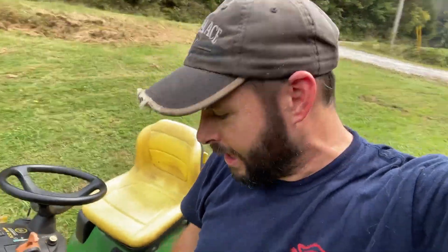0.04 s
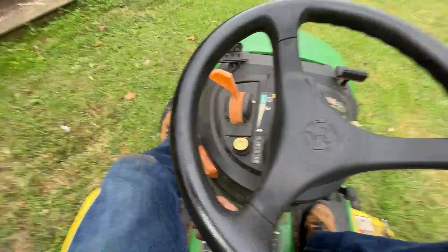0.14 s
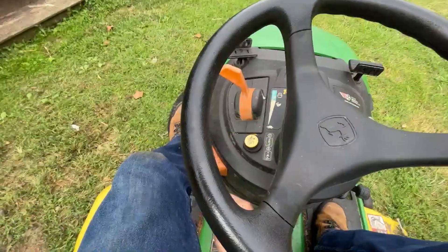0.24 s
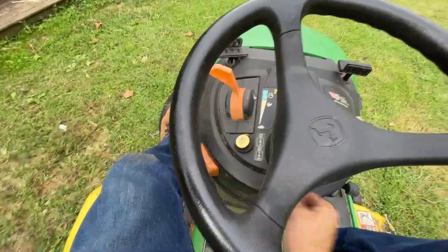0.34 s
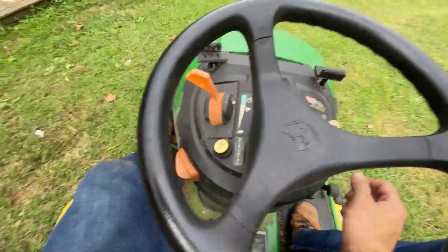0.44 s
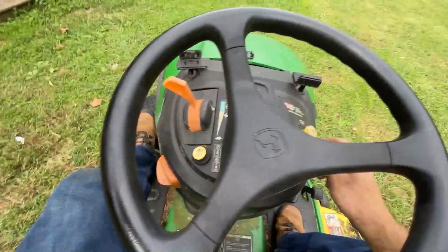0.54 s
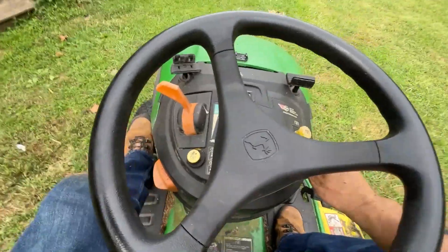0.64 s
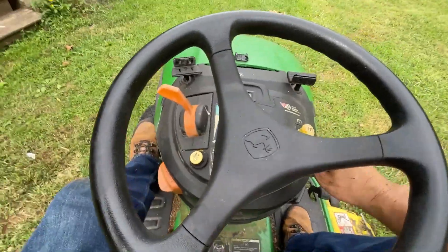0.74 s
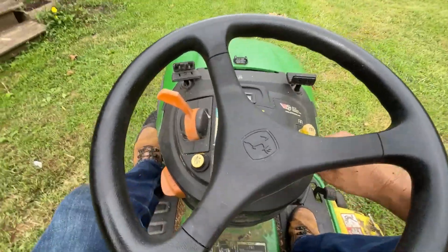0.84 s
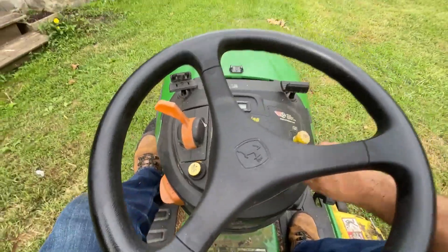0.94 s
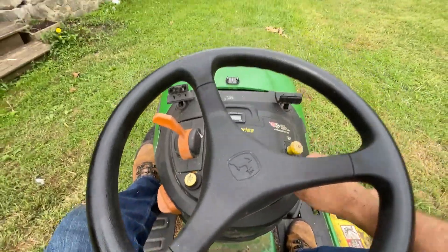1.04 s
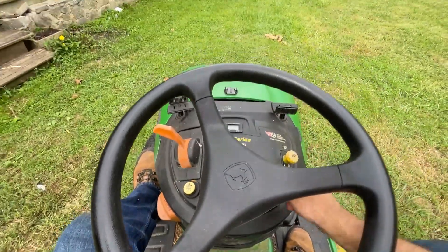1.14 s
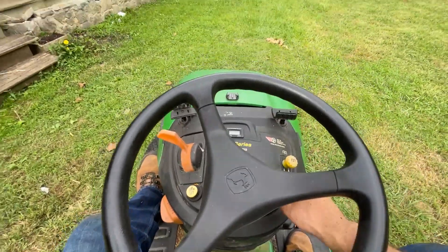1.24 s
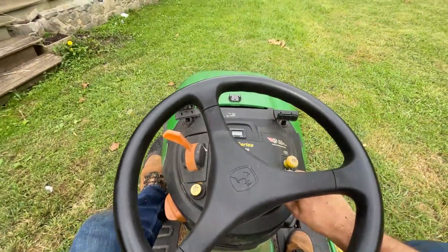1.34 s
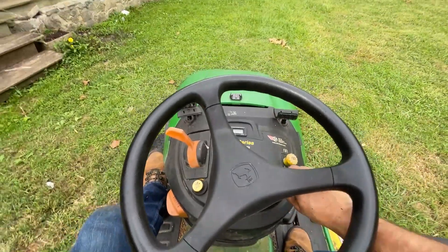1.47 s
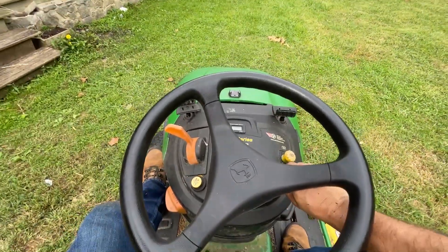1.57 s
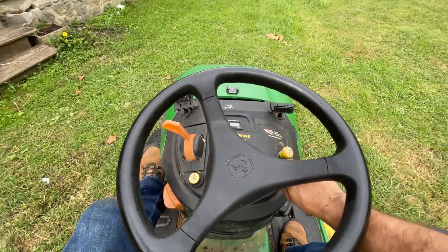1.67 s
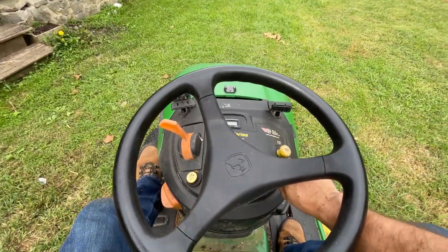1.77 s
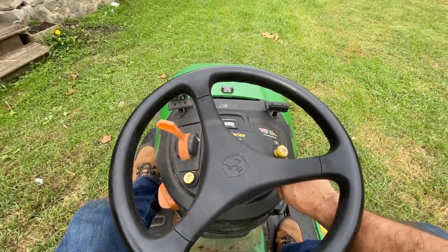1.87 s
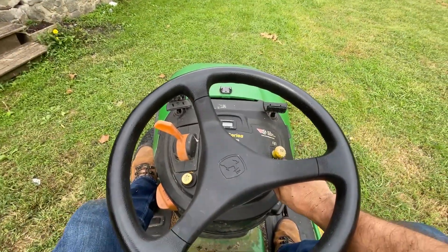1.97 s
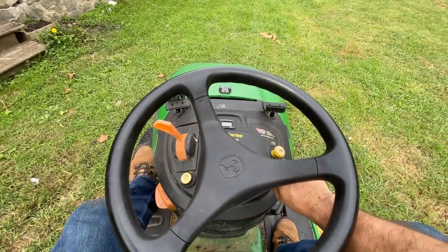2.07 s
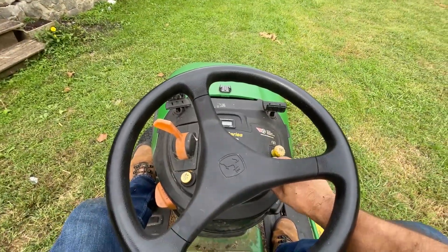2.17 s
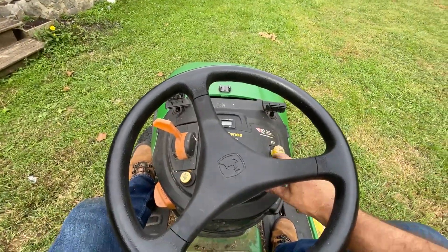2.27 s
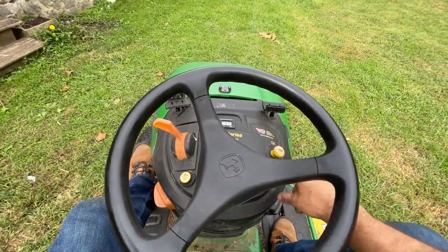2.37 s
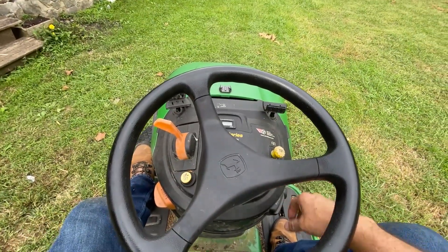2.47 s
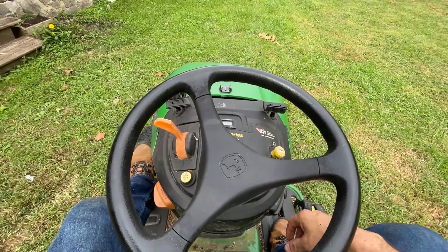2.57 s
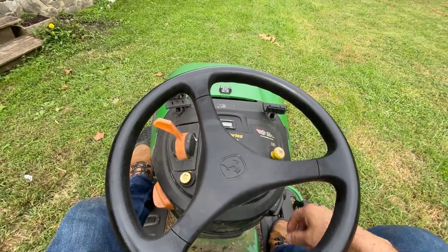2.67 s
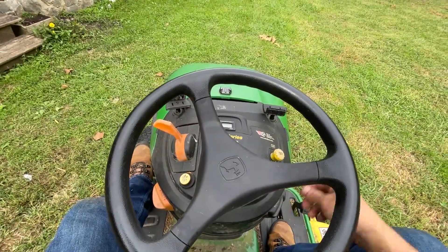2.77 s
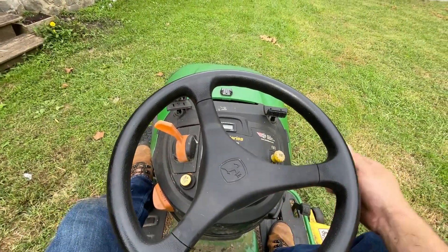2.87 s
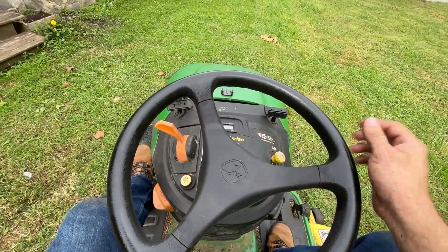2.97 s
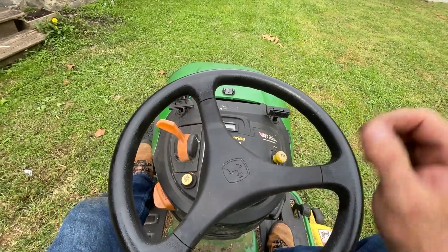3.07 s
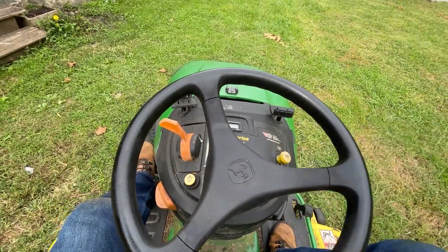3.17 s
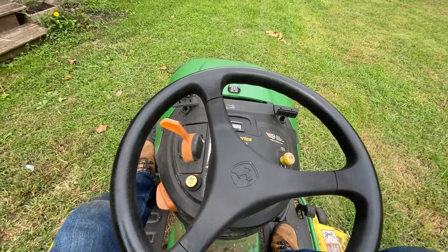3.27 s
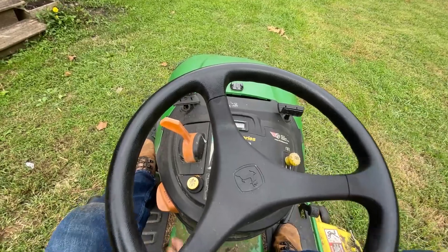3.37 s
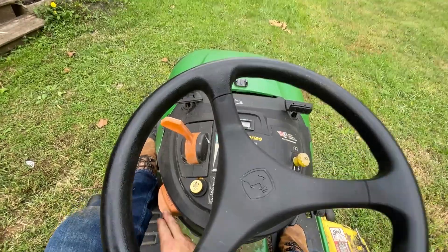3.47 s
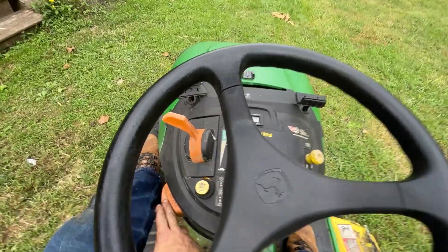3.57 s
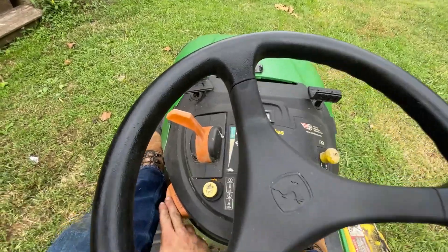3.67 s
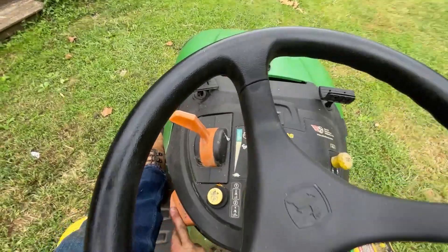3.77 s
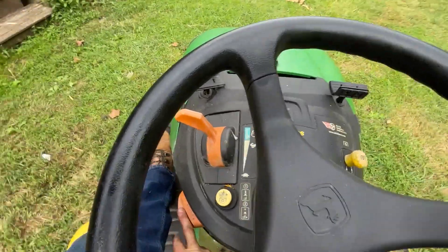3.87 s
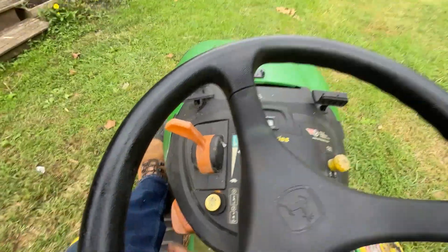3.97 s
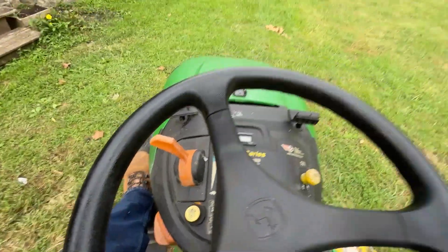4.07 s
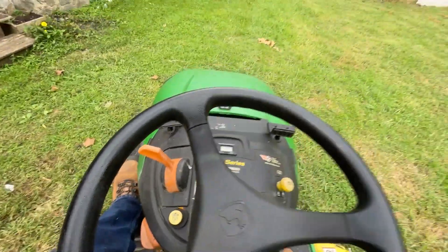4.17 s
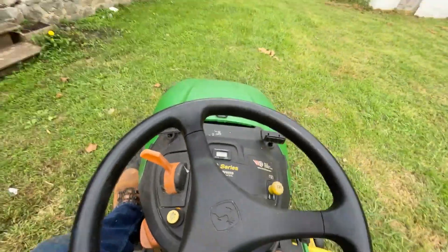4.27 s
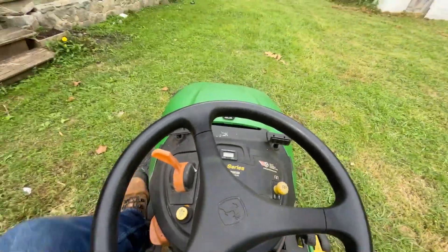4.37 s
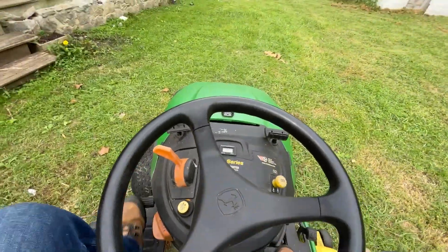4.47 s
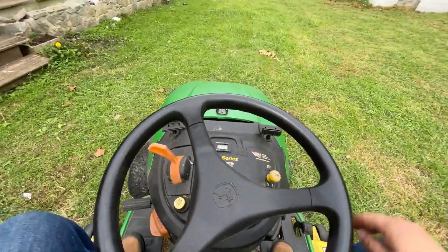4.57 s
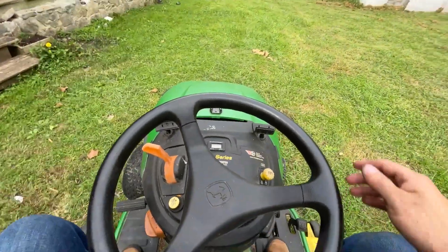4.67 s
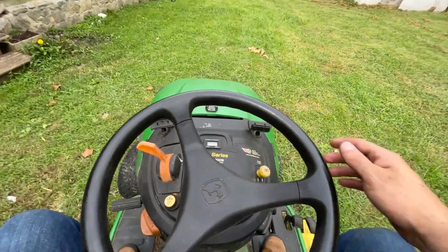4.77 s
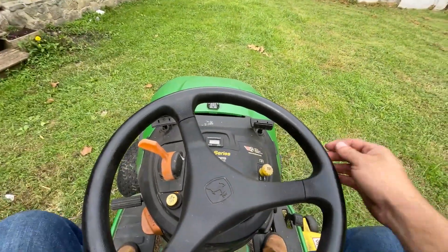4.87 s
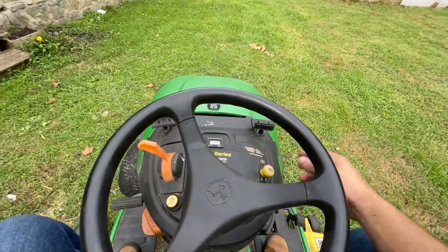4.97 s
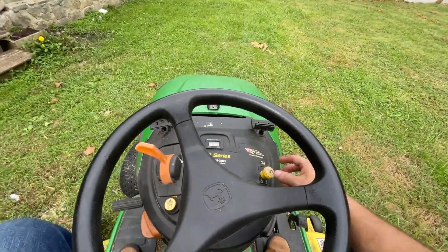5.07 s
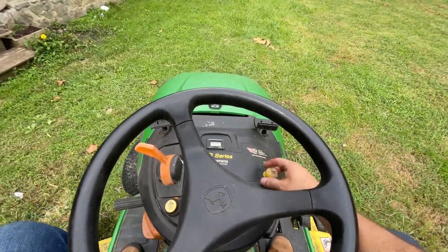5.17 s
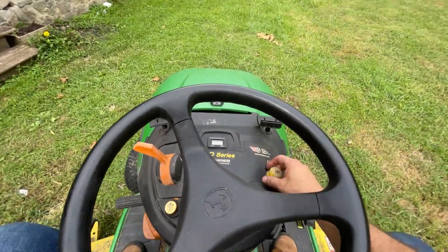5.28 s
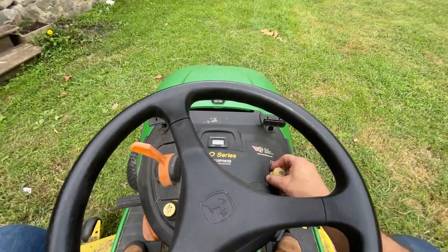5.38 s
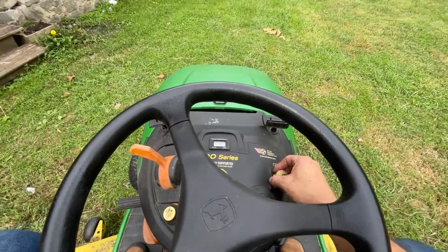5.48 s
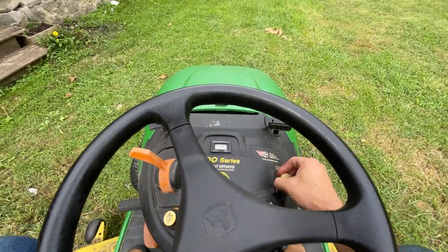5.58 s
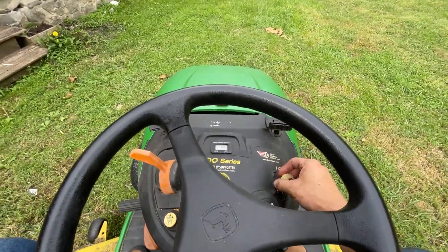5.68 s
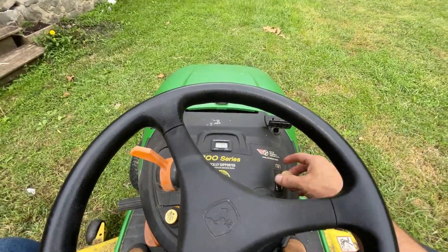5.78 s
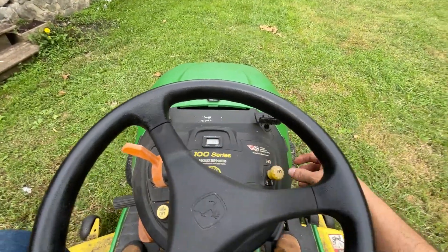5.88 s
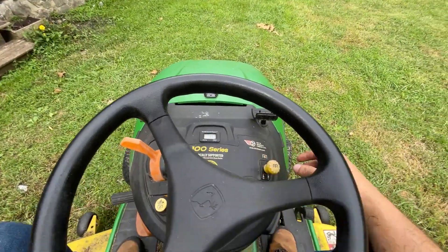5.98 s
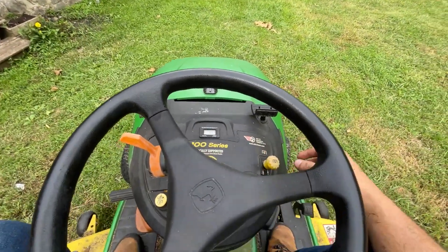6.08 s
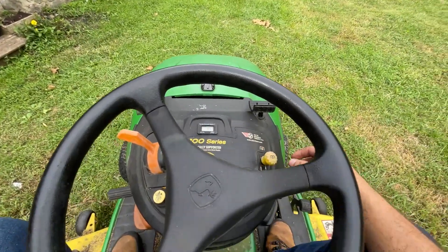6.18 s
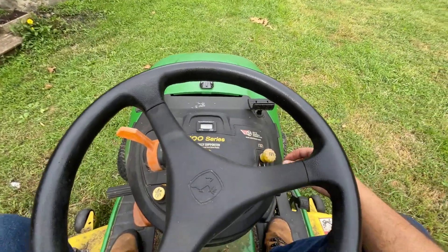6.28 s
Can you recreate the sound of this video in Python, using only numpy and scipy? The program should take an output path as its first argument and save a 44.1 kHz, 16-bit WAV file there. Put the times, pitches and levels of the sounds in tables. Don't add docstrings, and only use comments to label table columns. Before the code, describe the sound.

Outdoors on a lawn, heard from the mower seat: soft air, an insect buzz and slow ticks, with hollow knocks on pedal and panels. A starter grinds with metal bangs, uneven firings catch, and a two-cylinder engine hums loudly with clattering valves and loose plates. It misses briefly, backfires once, runs on, then sags into lumpy firing and begins picking up again. Close handheld stereo, slightly limited.

```python
import sys
import numpy as np
from scipy import signal
from scipy.fft import rfft, irfft, next_fast_len
from scipy.io import wavfile

SR = 44100
rng = np.random.default_rng(int(sys.argv[2]) if len(sys.argv) > 2 else 0)


def natural_amplitude(level_db):
    exponent = np.asarray(level_db, float) / 20
    return 10 ** exponent


def unload_audio(sound):
    columns = np.transpose(np.atleast_2d(sound))
    steps = np.round(np.clip(columns, -1, 1) * 32767)
    wavfile.write(sys.argv[1], SR, steps.astype(np.int16))


N = 278712
SIZE = next_fast_len(N, True)
TIME = np.arange(N) / SR
FREQ = np.maximum(np.fft.rfftfreq(SIZE, 1 / SR), 1)

# (frequency [Hz], likeness [0-1])
MACHINE_LIKENESS = [(60, 0.84), (290, 0.77), (560, 0.15), (860, .35), (1410, 0.2), (2900, 0.1), (3900, 0.3),
                    (4900, .1), (6100, 0.44), (8100, 0.1), (10000, 0.35), (15000, .011)]
LAWN_LIKENESS = [(60, .05), (200, 0.63), (700, 0.089), (2380, 0.12), (15000, .01)]
# (frequency [Hz], left over right [dB])
ENGINE_TILT = [(60, 3.5), (180, 3.5), (550, 3.5), (1650, 3.5), (4970, 0.5), (15000, 1.5)]
# (frequency [Hz], lead [radians])
PORT_LEAD = [(520, 0), (860, .7), (1500, 0), (2200, -1.5), (4300, -1.6), (5300, -2.7), (6400, -.3),
             (7100, -3.1), (10200, -4.8), (11000, -6.3)]
# (frequency [Hz], side gain [dB])
SIDE_TOP = [(10400, 0.5), (10700, -30), (12100, -30), (12400, 0), (13800, 7), (15000, 10)]

# (frequency [Hz], density [dB per Hz])
AIR_COLOUR = [(15, -38), (25, -10), (70, 5.5), (206, -5), (277, -4), (317, -4), (908, -14), (1400, -20),
              (1780, -11), (2250, -23), (3000, -20), (3550, -18.5), (4100, -28), (4700, -22), (5600, -30),
              (7000, -15.5), (8780, -14.5), (13500, -21.5), (15400, -14), (15900, -24)]
AIR_DB, LULL_S, LULL_DB = -42, 0.46, -3.5
# (time [s], level [dB], wing strokes [per s])
BUZZ = [
    (0.0, -41, 110),
    (0.35, -42, 114),
    (0.52, -41, 95),
    (0.796, -40, 110),
    (0.836, -58, 98),
]
# (time [s], peak [dB])
TICKS = [
    (0.8943, -37.5),
    (0.9581, -39),
    (1.0316, -36.5),
    (1.1093, -36.5),
    (1.1886, -39),
    (1.2664, -35),
    (1.341, -37.5),
    (1.4161, -37.5),
    (1.4969, -37),
    (1.569, -34),
]
# (frequency [Hz], density [dB per Hz])
INSECT_COLOUR = [(3530, -51), (6000, -22), (6530, -8), (7900, -7.5), (8900, 5), (9700, -6.5), (10800, 3),
                 (11900, -4.5), (13300, -5), (13900, -6), (14200, -20), (14600, -36), (14700, -16),
                 (15000, -6), (15800, -25)]
# (time [s], peak [dB], body [Hz],
# crack over peak [dB], left over right [dB])
KNOCKS = [(0.201, -35, 300, 8, 1.5), (0.234, -42, 290, -10, 3), (0.661, -14, 298, -8, 5),
          (0.881, -21, 312, -8, 3.5), (1.102, -24.5, 290, 14.5, 1), (1.121, -15.5, 321, -11, 3.5),
          (1.265, -34, 300, 4, 2), (1.457, -41, 250, 11, 2), (1.673, -19.5, 417, -5, 2),
          (1.568, -13, 298, -2, 3), (1.697, -10.5, 300, -16, 5)]
# (frequency [Hz], width [Hz], level [dB])
PANEL_MODES = [(455, 43, -5), (530, 64, -6), (746, 170, -13), (184, 22, -2), (130, 30, -10.5),
               (1000, 120, -22), (1410, 170, -21), (2080, 220, -32), (2740, 370, -34), (3560, 250, -43)]
# (time [s], peak [dB], body [Hz], spread [s])
SHOVES = [(0.801, -41, 300, 0.011), (0.873, -42, 280, .014), (0.926, -37, 245, 0.0075),
          (0.965, -28, 286, .013), (1.0, -41, 480, .02), (1.04, -46, 280, 0.011), (1.2, -38, 260, 0.0087),
          (1.43, -40, 300, 0.01), (0.711, -23, 308, 0.0069), (0.735, -32.5, 290, 0.013),
          (0.75, -40, 169, 0.016), (0.9, -39.5, 141, 0.027), (0.915, -35, 187, .014),
          (1.01, -41, 151, 0.021), (1.155, -33, 230, 0.013), (1.445, -42, 200, .015),
          (1.466, -37, 290, 0.0068)]
# (frequency [Hz], level [dB])
LATCH_MODES = [(1120, 2.5), (1324, 2.5), (1879, 1), (3090, -5), (3400, -3), (4760, -13)]
# (time [s], peak [dB], t60 [s])
LATCH_HITS = [
    (1.103, -27, 0.046),
    (1.108, -29, .06),
    (1.119, -30.5, 0.045),
    (1.270, -47, .04),
    (1.570, -30.5, .035),
]

# (time [s], peak [dB], t60 [s], top [Hz])
BANGS = [(1.671, -20, 0.075, 6000), (1.685, -14, 0.052, 7900), (1.704, -23, .03, 8200),
         (2.2, -17.5, 0.24, 3600), (2.052, -19, .12, 3400), (2.092, -19, .08, 3600), (1.69, -8, 0.08, 3100),
         (1.701, -6.5, 0.049, 2100), (1.708, -10, 0.081, 2300), (1.6, -31, 0.079, 5200),
         (1.862, -12, 0.11, 1400), (1.878, -26, 0.22, 7000), (1.9916, -7, 0.088, 2000),
         (2.0, -9, 0.11, 1840), (1.992, -25, 0.16, 9800), (2.039, -29.5, .15, 11000),
         (2.158, -29, 0.09, 12000), (2.246, -19, 0.086, 3800), (2.241, -30, 0.084, 12500),
         (2.42, -28.5, 0.075, 11500), (2.452, -32, 0.17, 13000), (3, -23, .05, 2000),
         (3.223, -4.5, 0.058, 1200), (5.721, -34, 0.08, 9000), (6.16, -28.5, 0.053, 9200),
         (6.2, -34, 0.09, 11000), (5.7, -31, 0.065, 6000), (4.535, -17, .2, 3000), (4.565, -19, .15, 3000),
         (4.655, -18, .12, 2200), (2.27, -21, .1, 3500), (4.503, -29.5, 0.24, 9000),
         (3.528, -29, 0.032, 1500), (3.716, -19, .04, 1400), (6.3, -9, .04, 1000),
         (5.741, -17, 0.034, 1200), (5.956, -33.5, 0.18, 8100), (6.043, -31.5, 0.34, 7300),
         (6.233, -28, 0.045, 8300)]
# (time [s], peak [dB], t60 [s], top [Hz])
BACKFIRE = [
    (3.7805, 0, .06, 2300),
    (3.7815, -22, .03, 16000),
]
BACKFIRE_S, DIP_DB, DIP_S = 3.8, -7, .012

# (time [s], rate [cycles per s])
SPEED = [(2.25, 18.4), (2.43, 23.8), (2.56, 26.2), (2.75, 27.2), (2.9, 27.0), (3.21, 24.9), (3.4, 26.9),
         (3.75, 26.7), (4.05, 26.2), (4.45, 25.85), (4.69, 25.43), (5.12, 26.2), (5.35, 25.7), (5.63, 25.7),
         (5.8, 20.5), (5.97, 18.5), (6.1, 19.3), (6.32, 23.0)]
# (time [s], level [dB])
EFFORT = [(1.672, -17), (1.78, -9), (1.87, -3), (2.04, 4), (2.43, 2), (2.9, -0.1), (3.5, 0.8), (3.95, -0.5),
          (4.5, .5), (4.75, -1.2), (5.62, 0.1), (5.9, -1.5), (6.32, 2)]
GOVERNED_PER_S, SAG_SPAN_PER_S, BOG_S = 25.1, 4.6, 5.0
# (governed level [dB], share of effort [ratio], change when bogged [dB])
RUNNING = [
    (-24, 1.05, 6),
    (-25.5, 0.81, -5),
    (-33.5, 0.5, -8),
]
# (place [share of cycle], level [dB])
VALVES = [
    (.04, 0),
    (.25, -1),
    (.41, -2),
    (.69, -1),
    (.95, -1),
]
# (frequency [Hz], density [dB per Hz])
ENGINE_COLOUR = [(24, -43), (40, -12), (80, -6), (119, -4), (211, -9), (306, -15.5), (422, -18), (933, -23),
                 (3390, -35), (6140, -40.5), (6800, -42.5), (7310, -47), (7900, -44), (8910, -43.5),
                 (11700, -50), (13600, -54.5), (15000, -122)]
# (frequency [Hz], width [Hz], height [dB])
CASING_MODES = [(370, 60, 3), (500, 50, 2), (760, 80, 2.5), (1320, 60, 3), (1480, 90, 2.5), (2750, 90, 3),
                (3085, 60, 3), (6170, 400, 3), (8600, 700, 3)]
# (frequency [Hz], width [Hz], level [dB])
STARTER_RIDGES = [(345, 130, 1), (493, 70, 3), (769, 90, 3.5), (970, 160, -11), (1190, 98, -5),
                  (1560, 140, -11), (1820, 140, -10), (2760, 140, -11), (3700, 820, -23), (5100, 350, -22),
                  (6600, 1000, -29)]
# (time [s], peak [dB], pipe
# ring [Hz])
POPS = [(1.76, -31, 70), (1.83, -26, 60), (1.938, -2.5, 119), (2.012, -11, 90), (2.048, -4.5, 138),
        (2.075, -2.5, 213), (2.088, -8, 96), (2.103, -2, 86), (2.131, -7, 186), (2.146, -11, 317),
        (2.166, -2.5, 190), (2.180, -1.5, 272), (2.2, -2, 98), (2.214, -6, 145), (2.235, -7.5, 320),
        (2.256, -0.5, 274), (2.269, -3, 202), (2.289, -1.5, 190), (2.311, -5, 172), (2.323, -15, 150),
        (2.347, -4, 202), (2.365, -3, 186), (2.378, -6, 176), (2.397, 0, 186), (2.413, 2, 184),
        (2.426, -9, 172), (2.441, -1, 179), (2.461, -6, 139), (2.476, -7.5, 220), (2.495, -8.5, 290),
        (2.51, -0.5, 199), (2.545, -9.5, 270), (3.787, -7, 300), (4.47, -10, 255), (4.55, -12, 308),
        (4.67, -7, 260), (4.9, -12, 300)]
# (time [s], peak [dB], pipe ring [Hz])
BOG_POPS = [(5.713, -3, 201), (5.733, -3, 182), (5.751, -6, 145), (5.771, -8.5, 403), (5.789, -9, 385),
            (5.805, -15, 172), (5.819, -14, 296), (5.843, -9, 250), (5.856, -10, 210), (5.868, -9, 370),
            (5.882, -7, 176), (5.907, -8, 182), (5.955, -13, 503), (5.974, -8, 312), (5.996, -14, 172),
            (6.009, -13, 75), (6.036, -8.5, 454), (6.051, -15, 177), (6.066, -11, 376), (6.08, -7, 86),
            (6.097, -9, 238), (6.13, -13, 150), (6.142, -9, 208), (6.159, -7, 183), (6.172, -7, 525),
            (6.196, -12, 178), (6.212, -4, 200), (6.233, -6.5, 129), (6.266, -10.5, 183), (6.282, -9, 236),
            (6.302, -6, 134), (5.741, -17, 700), (6.068, -13, 790), (5.915, -14, 560), (6.3, -7.5, 550),
            (5.9, -11, 520)]
WEAK_DB, WEAK_SPREAD_DB, WEAK_HZ, WEAK_OCTAVES = -11, 2.0, 400, .35
# (time [s], peak [dB], pitch [Hz], length [s])
SQUEAKS = [(1.81, -39, 5150, .05), (1.86, -34, 2760, .07), (1.95, -34, 2800, .04), (1.99, -30, 2650, .03),
           (1.935, -27, 1550, .05), (2.13, -25, 1500, .04), (2.48, -30, 3100, .05), (2.97, -23, 1500, .04),
           (4.445, -36, 6200, .02), (4.505, -35, 5200, .02), (5.38, -37, 4500, .03), (6.25, -36, 3050, .04)]
# (pitch [Hz], level [dB])
LOOSE_PLATES = [(700, -4), (770, -5), (845, -4), (930, -1), (1030, -2), (1160, -11), (1320, -4), (1470, -3),
                (1590, -3), (1900, -6), (2350, -8), (2750, -11), (3085, -12)]
RATTLE_DB, RATTLES_PER_S, RATTLE_T60_S, RATTLE_FITS_DB = -29, 140, .07, 3.0
PLATE_WANDER = .018
# (time [s], peak [dB], spread [s])
PUFFS = [(2.015, -44, .012), (2.035, -45, .008), (2.058, -46, .008), (2.097, -44, .007), (2.12, -47, .008),
         (2.165, -41, .009), (2.25, -44, .009), (2.275, -47, .007), (2.36, -45, .006), (2.43, -47, .01),
         (2.465, -45, .012), (5.635, -45, .012), (5.885, -51, .01), (5.97, -44, .011), (6.056, -43, .011),
         (6.29, -47, .015)]
# (frequency [Hz], width [Hz], level [dB])
PUFF_RIDGES = [(6200, 700, -8), (8700, 1000, 5), (10800, 1200, -6), (12500, 1200, -10)]

CYLINDER_GAP = 3 / 8
# (order [per cycle], level over the 2nd [dB])
PAIRED_ORDERS = [(1, -22), (2, 1.5), (4, -10), (6, 3), (7, -2), (9, -3.5), (10, -2), (11, -8), (13, -14),
                 (14, -5.5), (16, -1.5), (17, -12), (18, -14), (19, -13), (21, -14), (22, -13), (24, -11.5),
                 (25, -24), (26, -13), (28, -15), (29, -16), (30, -16), (32, -15), (35, -14), (40, -15)]
# (order [per cycle], level over the 3rd [dB])
LONE_ORDERS = [(3, 0), (4, -6), (6, -7), (7, -9), (9, -11), (10, -12), (12, -11), (13, -13)]
# (governed level [dB], change when sagging [dB])
EXHAUST_LAYERS = [
    (-18, -7),
    (-18.5, 2),
    (-38, 15),
    (-29.5, -6.5),
]
MISS_CHANGE = (-3, -12, 21, -20)
# (time [s], length [s], depth [0-1])
MISSES = [
    (2.955, 0.254, 0.89),
    (4.425, 0.027, 0.94),
    (2.47, 0.065, 0.4),
]
MISS_EDGE_S = 0.01
BOG_TONE_DB = -9
SURGE_DB, SURGE_HZ = -27, (300, 643)


def rms_one(x):
    return x / np.sqrt(np.mean(x ** 2) + 1e-20)


def in_time(rows):
    s, *columns = np.transpose(rows)
    return [np.interp(TIME, s, c) for c in columns]


def over_hz(points):
    hz, value = np.transpose(points)
    return np.interp(np.log(FREQ), np.log(np.maximum(hz, 1)), value)


def ridges(modes):
    return sum(natural_amplitude(db) / (1 + (2 * (FREQ - hz) / width) ** 2) for hz, width, db in modes)


def drift(rate):
    steps = rng.standard_normal(int(N / SR * 400) + 2)
    r = np.exp(-2 * np.pi * rate / 400)
    smooth = rms_one(signal.lfilter([1], [1, -2 * r, r * r], steps))
    return np.interp(TIME * 400, np.arange(len(steps)), smooth)


def shaped(x, gain):
    return irfft(rfft(x, SIZE) * gain, SIZE)[..., :N]


def wide(gate, gain, likeness=MACHINE_LIKENESS):
    alike = np.clip(over_hz(likeness), 0, 1)
    noise = gate * rng.standard_normal((2, N))
    mid, side = shaped(noise, gain * np.sqrt([1 + alike, 1 - alike]))
    return np.array([mid + side, mid - side]) / np.sqrt(2 * np.mean(gain ** 2))


def band_pass(x, low_hz, high_hz, order=2):
    return signal.sosfilt(signal.butter(order, [low_hz, high_hz], "band", fs=SR, output="sos"), x)


def ring(length, hz, t60, rise):
    t = np.arange(int(length * SR)) / SR
    return np.sin(2 * np.pi * hz * t) * natural_amplitude(-60 * t / t60) * (1 - np.exp(-t / rise))


def add(out, s, sound):
    i = int(s * SR)
    out[..., i:i + sound.shape[-1]] += sound[..., :N - i]


def lawn_air():
    level_db = AIR_DB + LULL_DB * np.clip((TIME - LULL_S) * 10, 0, 1)
    return natural_amplitude(level_db) * wide(natural_amplitude(1.5 * drift(6.4)), natural_amplitude(over_hz(AIR_COLOUR)), LAWN_LIKENESS)


def insects():
    buzz_db, strokes = in_time(BUZZ)
    stroke = np.exp(0.48 * np.cos(2 * np.pi * np.cumsum(strokes) / SR) + 0.12 * drift(60))
    gate = natural_amplitude(buzz_db) * rms_one(stroke)
    t = np.arange(int(.012 * SR)) / SR
    tick = np.sin(np.pi * t / t[-1]) ** 2 * np.exp(-t / 0.0031) * 4.6
    for s, db in TICKS:
        for lag, drop_db in ((0, -1), (.019, -10), (.034, -12)):
            add(gate, s + lag, natural_amplitude(db + drop_db) * tick)
    return wide(gate, natural_amplitude(over_hz(INSECT_COLOUR)), LAWN_LIKENESS)


def knocks():
    out = np.zeros((2, N))
    t = np.arange(int(.3 * SR)) / SR
    rumble_cut = signal.butter(2, 110, "high", fs=SR, output="sos")
    for s, db, hz, crack_db, pan_db in KNOCKS:
        body = ring(.3, hz, 0.11, 0.0012) + 0.29 * ring(.3, hz * 0.8, 0.28, 0.0013)
        shake, left, right = rng.standard_normal((3, len(t))) * (1 - np.exp(-t / 0.00029))
        for mode_hz, width, mode_db in PANEL_MODES:
            panel = rms_one(band_pass(shake, mode_hz - width / 2, mode_hz + width / 2))
            body = body + natural_amplitude(mode_db - 60 * t / 0.099) * panel
        crack = band_pass([left, right], 700, 3900)
        for tick_hz in rng.uniform(0.96, 3.3, 5) * 1000:
            crack = crack + 0.21 * ring(.3, tick_hz, 0.089, 0.00033)
        body = signal.sosfilt(rumble_cut, body)
        crack = natural_amplitude(crack_db - 11.5 - 60 * t / 0.066) * crack
        add(out, s, natural_amplitude(db) * natural_amplitude([[pan_db / 2], [-pan_db / 2]]) * (body + crack))
    return out


def shoves():
    out = np.zeros(N)
    t = np.arange(-.05, .05, 1 / SR)
    for s, db, hz, spread in SHOVES:
        scuff = rms_one(band_pass(rng.standard_normal(len(t)), 130, 1150))
        swell = np.exp(-.5 * (t / spread) ** 2)
        add(out, s - .05, natural_amplitude(db) * swell * (np.sin(2 * np.pi * hz * t) + 0.16 * scuff))
    return out * natural_amplitude([[2.2], [-2.2]])


def latch():
    out = np.zeros((2, N))
    for s, db, t60 in LATCH_HITS:
        ears_db = rng.normal(0, 2.7, (len(LATCH_MODES), 2))
        for (hz, mode_db), (left, right) in zip(LATCH_MODES, ears_db):
            ears = natural_amplitude([[left], [right]]) * np.sign([[1], [right]])
            add(out, s, natural_amplitude(db + mode_db) * ears * ring(.1, hz, t60, 0.00043))
    return out


def bangs():
    out = np.zeros((2, N))
    t = np.arange(int(.15 * SR)) / SR
    for s, db, t60, top_hz in BANGS + BACKFIRE:
        mid, side = rng.standard_normal((2, len(t))) * natural_amplitude(-60 * t / t60) * (1 - np.exp(-t / .0006))
        pair = np.array([mid + .6 * side, mid - .6 * side])
        add(out, s, natural_amplitude(db + 4) * band_pass(pair, 400, top_hz, order=3))
    return out


def running_noise(cycle, levels_db):
    def beat(lag):
        return sum(natural_amplitude(db) * np.exp(30.0 * (np.cos(2 * np.pi * (cycle - share - lag)) - 1))
                   for share, db in VALVES)

    clicks = np.zeros(N)
    for k, (share, db) in enumerate(VALVES):
        clicks += natural_amplitude(db) * np.diff(np.floor(cycle - share), prepend=0) * (-1) ** k
    clicks = clicks * natural_amplitude(2.0 * drift(14.5)) * (TIME > 2.3)
    humps = sum(db / (1 + (2 * (FREQ - hz) / width) ** 2) for hz, width, db in CASING_MODES)
    colour = natural_amplitude(over_hz(ENGINE_COLOUR) + humps)
    rattle = rng.standard_normal(900) * np.exp(-np.arange(900) / 200)
    smear = np.exp(1j * np.angle(rfft(rattle, SIZE)))
    low = 1 / (1 + (FREQ / 630) ** 10)
    split = 1 / (1 + (FREQ / 1200) ** 8)
    high = 1 / (1 + (2500 / FREQ) ** 6)
    rumble_db, clatter_db, hiss_db = levels_db
    layers = [(rumble_db, low, .5, 0, 1.6, -4),
              (clatter_db - 2.5, split - low, .6, 0, 1.0, -5),
              (clatter_db - 3.5, 1 - split - high, .4, .2, 1.0, -11),
              (hiss_db, high, .05, .2, .6, -22)]
    out = 0
    for level_db, band, depth, lag, patchy_db, click_db in layers:
        patches = natural_amplitude(patchy_db * drift(25) + 0.5 * patchy_db * drift(3.1))
        gate = rms_one((1 + depth * beat(lag) * (TIME > 2.0)) * patches)
        gain = colour * np.sqrt(np.maximum(band, 0) / (1 + (230 / FREQ) ** 8))
        ticking = natural_amplitude(click_db) * rms_one(shaped(clicks, gain * smear))
        out = out + natural_amplitude(level_db) * (TIME > EFFORT[0][0]) * (wide(gate, gain) + ticking)
    deep = wide(natural_amplitude(2.0 * drift(55)), colour / np.sqrt(1 + (FREQ / 230) ** 8))
    return out + natural_amplitude(-27.5) * np.clip((TIME - 1.9) / 0.021, 0, 1) * deep


def starter():
    chatter = natural_amplitude(.8 * drift(22) + 2 * drift(90))
    turning = np.interp(TIME, [1.68, 1.71, 1.9, 2.06], [0, 1, 1, 0])
    return natural_amplitude(-22.0) * turning * wide(chatter, ridges(STARTER_RIDGES))


def pops(cycle, bogged):
    out = np.zeros(N)
    t = np.arange(-.03, .03, 1 / SR)
    firings = np.diff(np.floor(cycle)) + np.diff(np.floor(cycle - CYLINDER_GAP))
    fired = np.flatnonzero(firings * (bogged[1:] > .5))
    weak = []
    for i, (a, b) in zip(fired, rng.standard_normal((60, 2))):
        if min(abs(i / SR - s) for s, *_ in BOG_POPS) > .016:
            weak.append((i / SR, WEAK_DB + WEAK_SPREAD_DB * a, WEAK_HZ * 2 ** (WEAK_OCTAVES * b)))
    for s, db, hz in POPS + BOG_POPS + weak:
        swell = np.exp(-.5 * (t / (0.0035 + 0.07 / hz)) ** 2)
        add(out, s - .03, -natural_amplitude(db - 2.5) * swell * np.cos(2 * np.pi * hz * t))
    return out


def squeaks():
    out = np.zeros((2, N))
    waver, chop = 1 + 0.016 * drift(78), natural_amplitude(4.0 * drift(73))
    for s, db, hz, length in SQUEAKS:
        span = slice(int((s - length) * SR), int((s + length) * SR))
        swell = chop[span] * np.exp(-.5 * ((TIME[span] - s) / (length / 3)) ** 2)
        phase = 2 * np.pi * hz * np.cumsum(waver[span]) / SR
        out[:, span] += natural_amplitude(db) * swell * np.sin(phase + [[0], [1.0]])
    return out


def rattles():
    out = np.zeros((2, N + 40))
    taps = natural_amplitude(3.5 * np.minimum(rng.exponential(1, N), 4)) * rng.choice([-1, 1], N)
    taps = taps * (rng.random(N) < RATTLES_PER_S / SR)
    r = natural_amplitude(-60 / (RATTLE_T60_S * SR))
    stray = 1 + PLATE_WANDER * drift(4.5)
    fits = natural_amplitude(RATTLE_FITS_DB * drift(6.1))
    for k, (hz, db) in enumerate(LOOSE_PLATES):
        turn = np.exp(2j * np.pi * hz / SR * np.cumsum(np.roll(stray, 31013 * k)))
        struck = natural_amplitude(db) * np.roll(taps, 20011 * k) * np.roll(fits, 23003 * k)
        rung = (signal.lfilter([1], [1, -r], struck * turn.conj() + 1e-18) * turn).imag
        for ear, lag in enumerate(rng.integers(0, 40, 2)):
            out[ear, lag:lag + N] += rung
    return rms_one(out[:, :N])


def puffs():
    gate = sum(natural_amplitude(db) * np.exp(-.5 * ((TIME - s) / spread) ** 2) for s, db, spread in PUFFS)
    return wide(gate, ridges(PUFF_RIDGES))


def exhaust(cycle, fifth_db, eighth_db, lone_db, paired_db):
    waver = natural_amplitude(1.0 * drift(6))

    def order(k, lag):
        upper = k > 11
        tone = np.cos(2 * np.pi * k * (cycle + .16 * upper) - lag)
        return np.sqrt(2) * tone * np.roll(waver, 9001 * k) ** (1 + 2 * upper)

    def pair(k):
        return -np.sign(np.cos(np.pi * k * CYLINDER_GAP) + 1e-9) * order(k, .15)

    def lone(k):
        return order(k, np.pi * k * CYLINDER_GAP + 2.9)

    out = natural_amplitude(fifth_db) * pair(5) + natural_amplitude(eighth_db) * pair(8)
    out += natural_amplitude(paired_db) * sum(natural_amplitude(db) * pair(k) for k, db in PAIRED_ORDERS)
    out += natural_amplitude(lone_db) * sum(natural_amplitude(db) * lone(k) for k, db in LONE_ORDERS)
    return out * np.clip((TIME - 2.22) / 0.038, 0, 1)


def missing():
    out = np.zeros(N)
    for s, length, depth in MISSES:
        inside_s = np.minimum(TIME - s, s + length - TIME)
        out += depth * np.clip(inside_s / MISS_EDGE_S + .5, 0, 1)
    return out


def surge(bogged):
    low_hz, high_hz = SURGE_HZ
    band = 1 / np.sqrt((1 + (low_hz / FREQ) ** 6) * (1 + (FREQ / high_hz) ** 10))
    return natural_amplitude(SURGE_DB) * np.sqrt(bogged) * wide(natural_amplitude(2.5 * drift(30)), band)


def scene():
    [speed], [effort_db] = in_time(SPEED), in_time(EFFORT)
    cycle = np.cumsum(speed * (1 + .002 * drift(9))) / SR + 0.98
    sag = np.clip((GOVERNED_PER_S - speed) / SAG_SPAN_PER_S, 0, 1)
    bogged = sag * (TIME > BOG_S)
    miss = missing()
    orders_db = [db + miss_db * miss + sag_db * sag + BOG_TONE_DB * bogged
                 for (db, sag_db), miss_db in zip(EXHAUST_LAYERS, MISS_CHANGE)]
    noise_db = [db + share * effort_db + bog_db * bogged for db, share, bog_db in RUNNING]

    shaking = natural_amplitude(RATTLE_DB + noise_db[1] - RUNNING[1][0]) * np.clip((TIME - 1.95) / 0.2, 0, 1)
    steady = exhaust(cycle, *orders_db) + running_noise(cycle, noise_db) + shaking * rattles()
    dip = natural_amplitude(DIP_DB * np.exp(-.5 * ((TIME - BACKFIRE_S - .012) / DIP_S) ** 2))
    engine = dip * steady + pops(cycle, bogged) + bangs() + squeaks()
    engine = engine + starter() + surge(bogged) + puffs()
    lean = natural_amplitude(over_hz(ENGINE_TILT) / 2)
    engine = shaped(engine, [lean, np.exp(1j * over_hz(PORT_LEAD)) / lean])

    turned_down = np.interp(TIME, [1.67, 2.6], [1, .03])
    return engine + latch() + knocks() + shoves() + turned_down * (insects() + lawn_air())


def low_pass(x):
    return signal.sosfilt(signal.butter(12, 17060, fs=SR, output="sos"), x)


def record(dry):
    left, right = .8 * np.tanh(dry / .8)
    top = FREQ < 15900
    gap = np.where((FREQ > 13900) & (FREQ < 15050), natural_amplitude(-30), 1)
    gains = [top * gap, top * natural_amplitude(over_hz(SIDE_TOP))]
    mid, side = shaped([(left + right) / 2, (left - right) / 2], gains)
    return low_pass(np.array([mid + side, mid - side]))


dry = scene()
out = record(dry)
unload_audio(out)
```